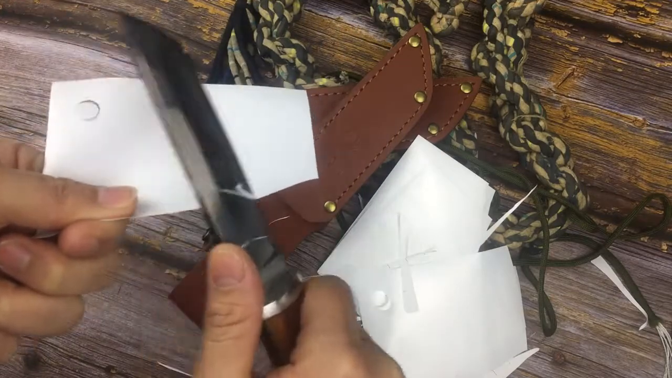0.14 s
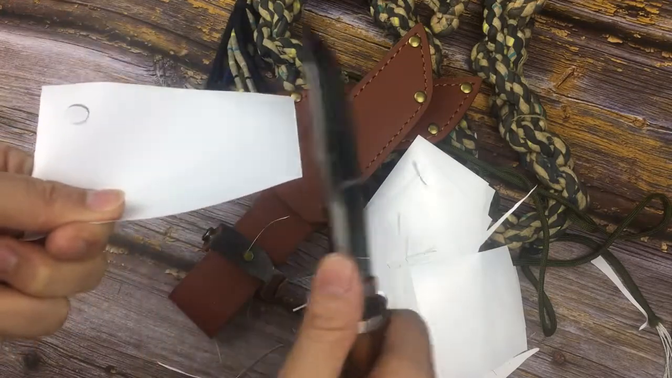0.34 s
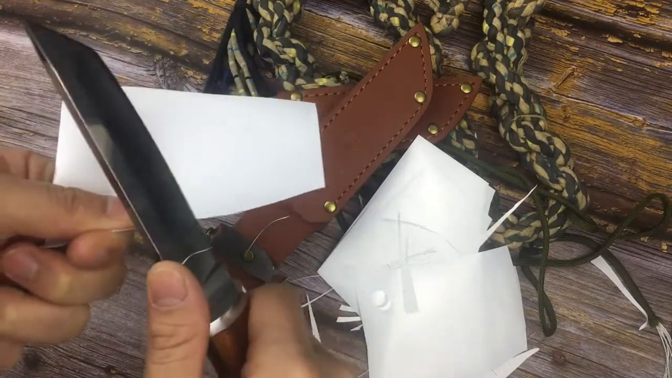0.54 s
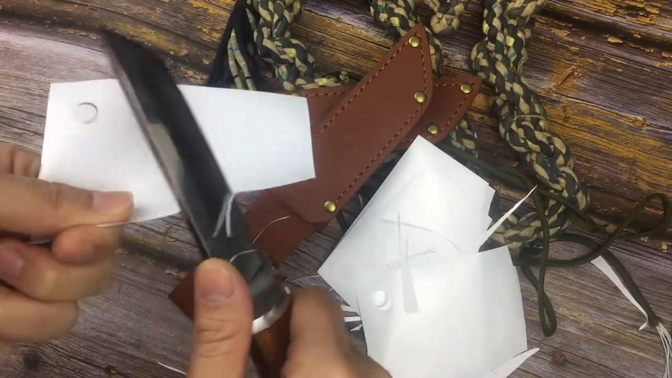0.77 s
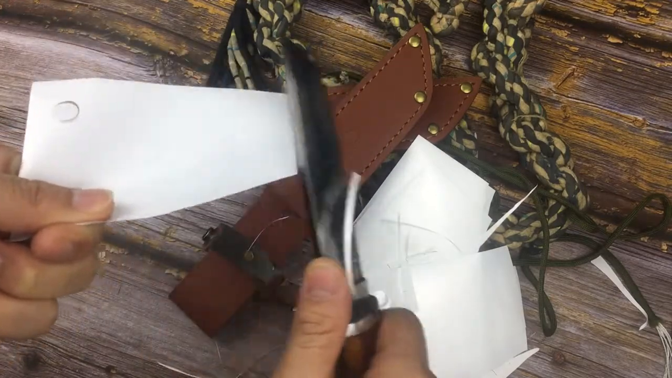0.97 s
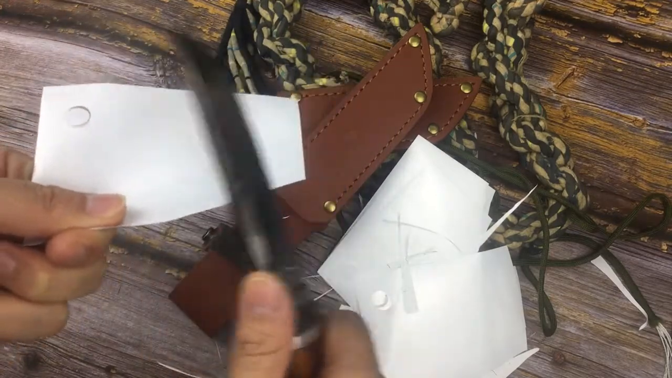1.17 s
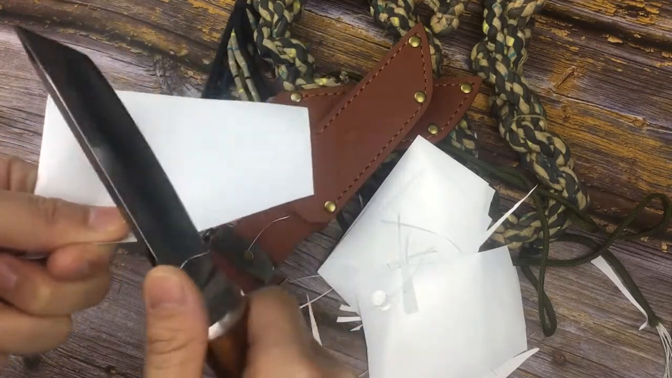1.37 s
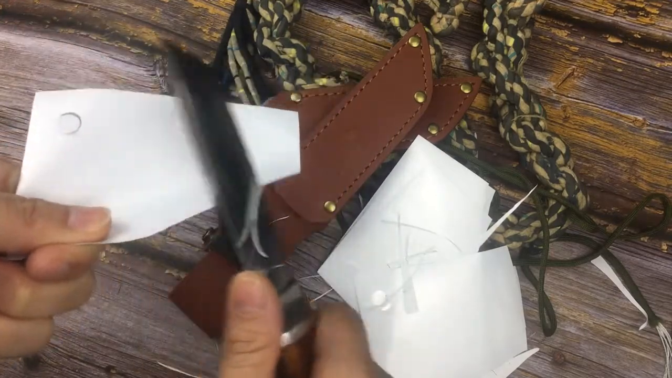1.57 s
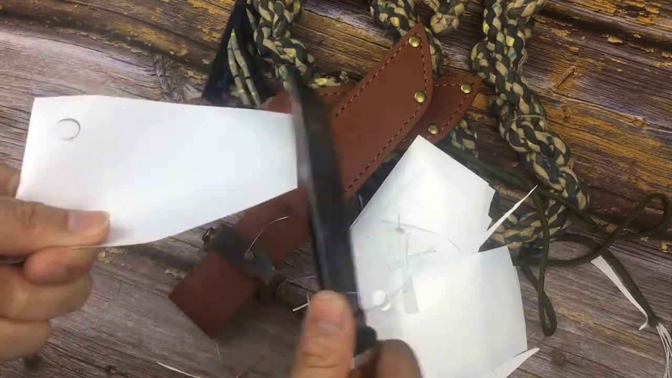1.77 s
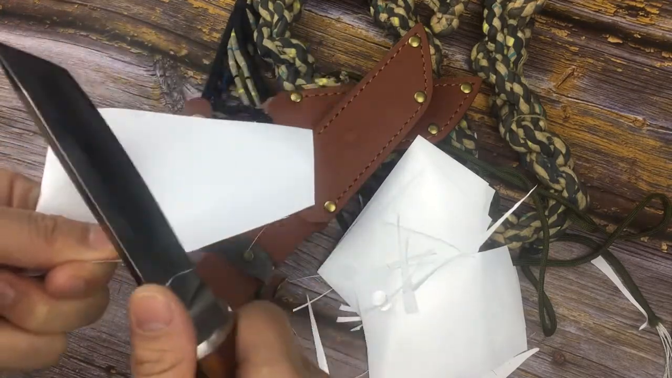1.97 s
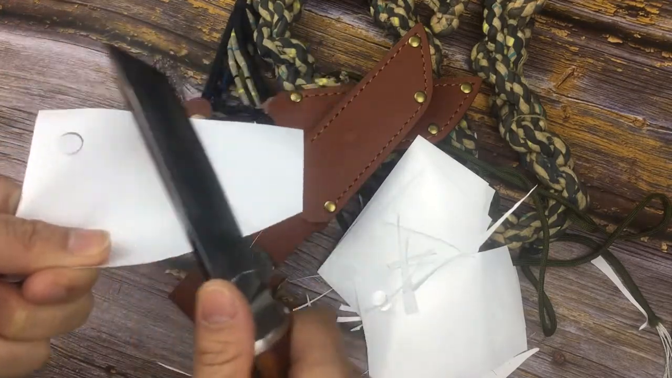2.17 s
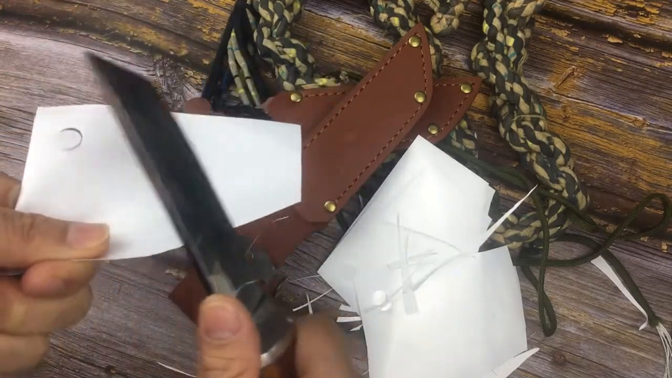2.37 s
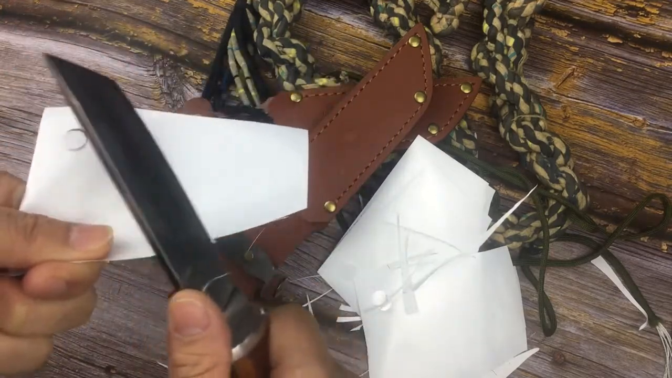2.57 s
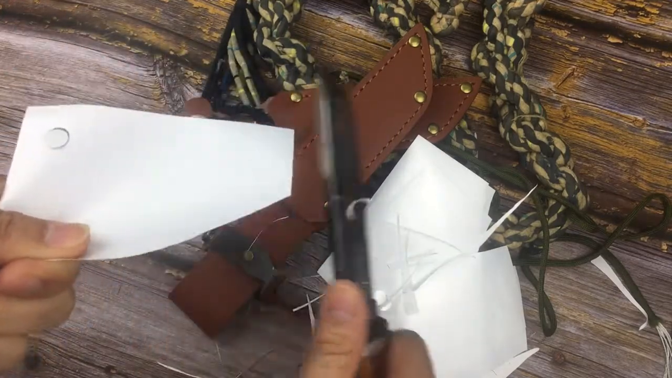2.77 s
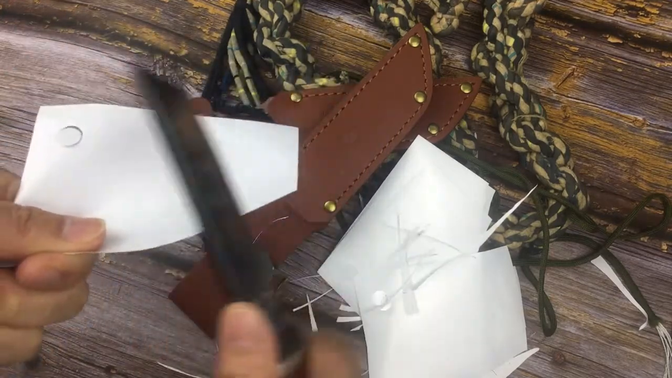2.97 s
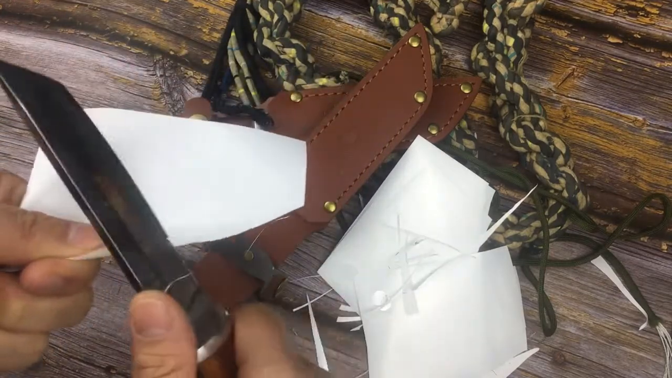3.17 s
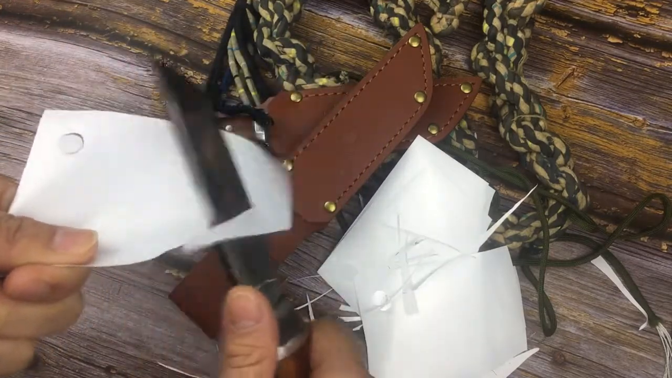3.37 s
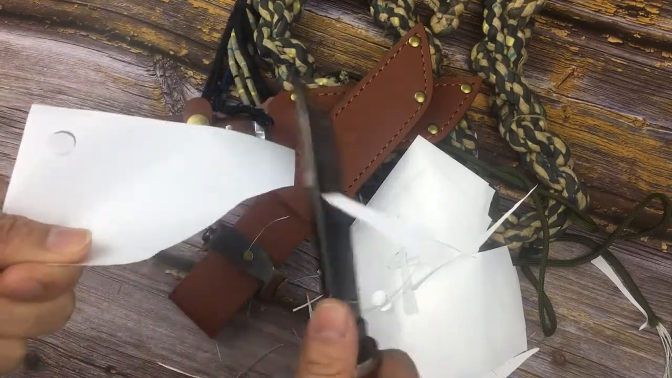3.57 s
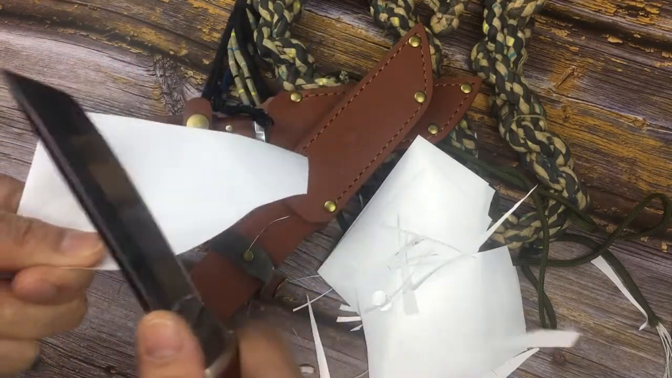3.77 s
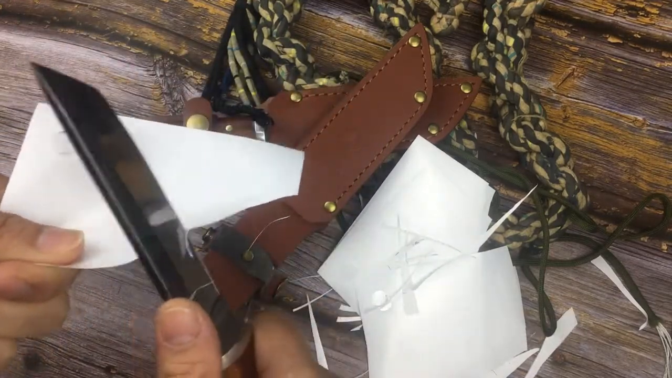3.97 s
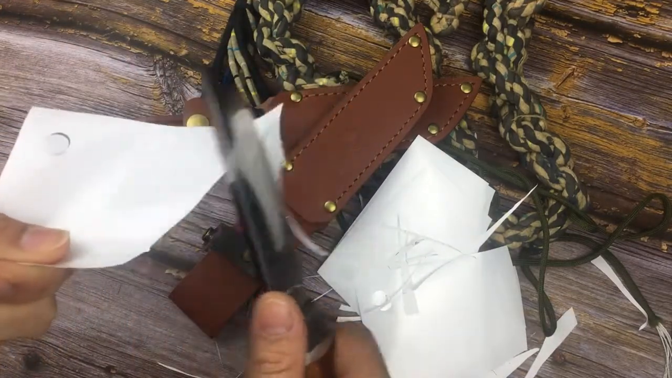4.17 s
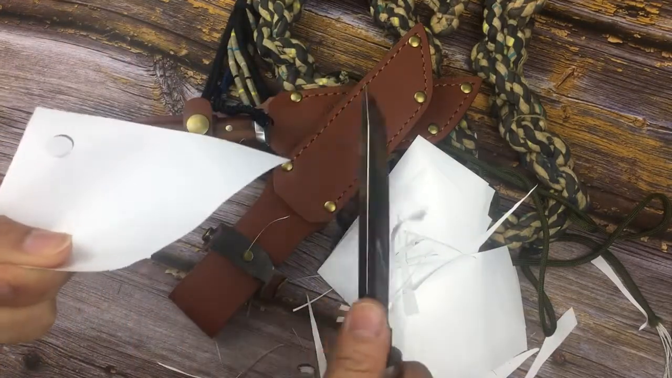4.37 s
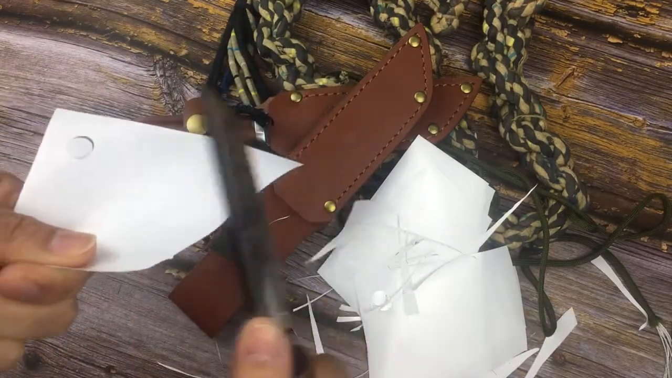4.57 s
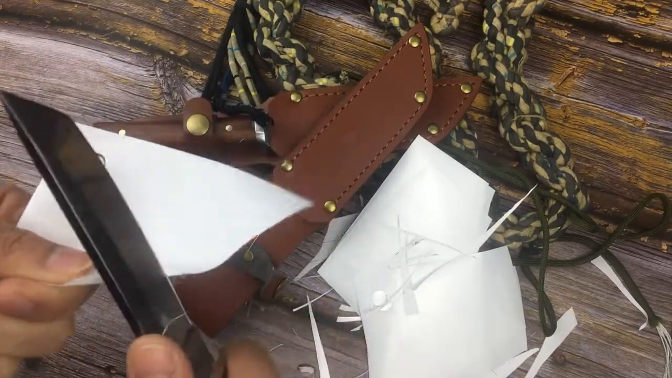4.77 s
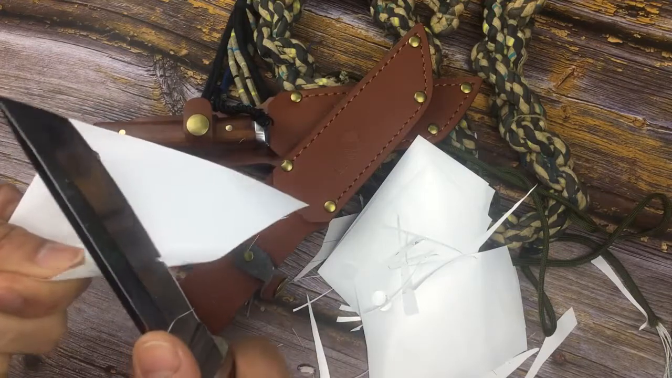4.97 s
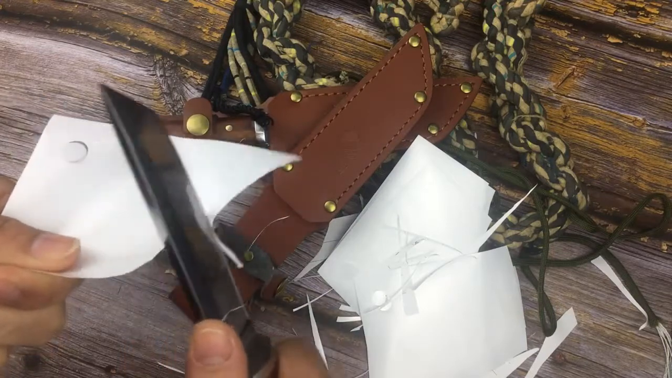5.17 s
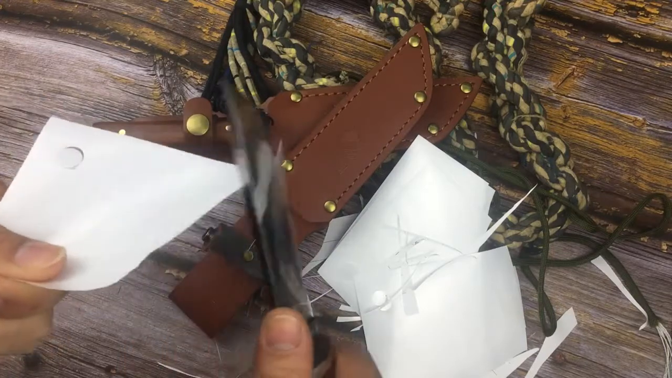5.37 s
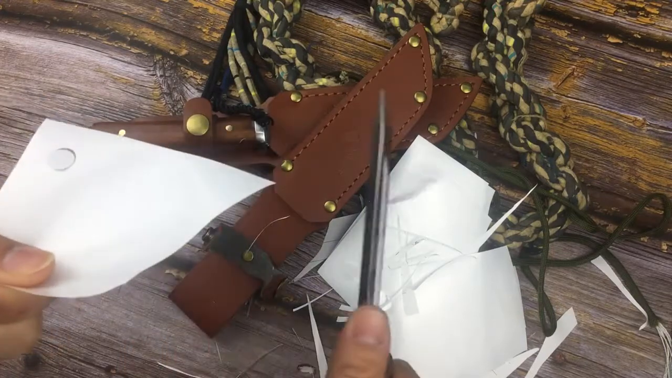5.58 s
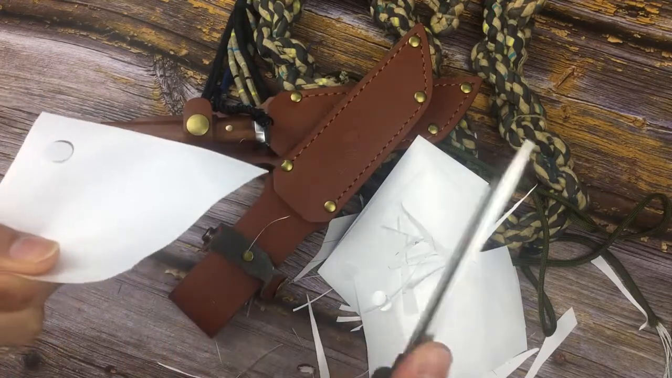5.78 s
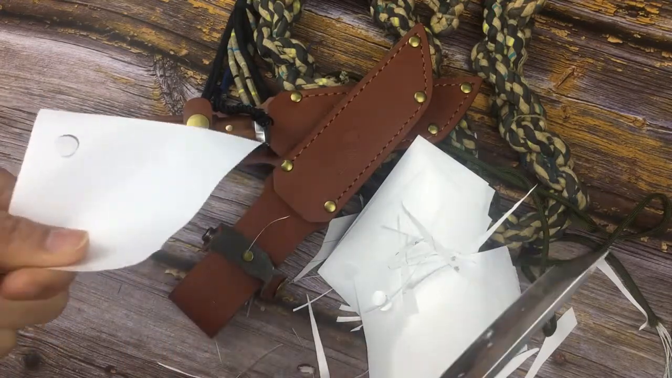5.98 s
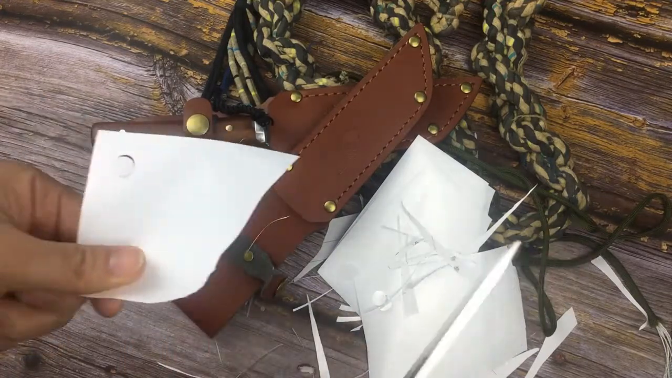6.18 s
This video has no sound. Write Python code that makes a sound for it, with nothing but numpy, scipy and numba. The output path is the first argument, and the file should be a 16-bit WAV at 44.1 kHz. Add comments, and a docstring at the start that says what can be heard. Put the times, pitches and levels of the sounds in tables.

```python
"""A blade is heard first sliding faintly over paper, in a small quiet room with low rumble and mains hum.
A sharp knife then shaves eight strips off the sheet, held above a wooden board and close to the microphone.
Cutting is a dense train of random fibre clicks, part of it passed through the sheet's wandering resonances.
Snaps, flaps, taps and crinkles are short decaying noise bursts; squeaks are sines of unsteady pitch.
A board reflection and a short decaying tail place the paper in the room."""
import sys
import numpy as np
from scipy import signal
from scipy.fft import rfft, irfft
from scipy.io import wavfile
from numba import njit

SR = 44100
rng = np.random.default_rng(int(sys.argv[2]) if len(sys.argv) > 2 else 0)


def dump_mix(stems):
    """Bounce the given channels to the path in sys.argv[1] as a 16-bit WAV at rate SR."""
    frames = np.atleast_2d(stems).T  # one column per channel
    limited = np.clip(frames, -1, 1)  # hard clip at full scale
    pcm = np.round(limited * 32767).astype(np.int16)
    wavfile.write(sys.argv[1], SR, pcm)


N = 274724
T = np.arange(N) / SR


def undb(db):
    """Amplitude ratio: 20 dB is a factor of ten."""
    return 10 ** (np.asarray(db) / 20)


def unit(x):
    """Normalisation of the mean power: scale to an rms of 1."""
    return x / np.sqrt(np.mean(x ** 2))


def walk(rate):
    """Random modulation: straight lines join normal draws, rate a second; the last of 4096 is held."""
    knots = rng.standard_normal(4096)
    return np.interp(T * rate, np.arange(len(knots)), knots)


def colour(x, points, size=4096):
    """Minimum-phase filtering: a causal filter follows (frequency [Hz], gain [dB]) points."""
    hz, db = np.transpose(points)
    bin_hz = np.arange(size // 2 + 1) * SR / size
    gain_db = np.interp(np.log(bin_hz + 1), np.log(hz), db)
    cepstrum = irfft(np.log(undb(gain_db)))
    # folding the cepstrum onto positive times makes the filter causal
    cepstrum[1:size // 2] *= 2
    cepstrum[size // 2 + 1:] = 0
    impulse_response = irfft(np.exp(rfft(cepstrum)))
    return signal.fftconvolve(x, impulse_response)[:len(x)]


@njit
def resonate(x, hz, width):
    """Simple resonance: a band-pass with a moving centre and gain 1 at the peak."""
    y = np.empty(len(x))
    band, low = 0., 0.  # the two stored states
    for i in range(len(x)):
        g = np.tan(np.pi * hz[i] / SR)
        damping = width / hz[i]
        v = (band + g * (x[i] - low)) / (1 + g * (g + damping))
        band = 2 * v - band
        low = low + 2 * g * v
        y[i] = damping * v
    return y


def background(air_db=-58.5, air_waver_db=1.8, hum_waver_db=0.5, hum_width_hz=5.6):
    """Ambient noise: shaped broadband rumble and hiss, plus narrow-band hum of wavering level."""
    # spectral shape of the quiet room's air: (frequency [Hz], relative density [dB per Hz])
    air_shape = [(22, -20), (38, 3), (60, -1), (78, -13), (105, -5.5), (170, -7), (240, -18.5),
                 (330, -13.5), (470, -19), (800, -18), (2000, -27), (3200, -36), (5000, -40), (9600, -42)]
    # mains hum and a faint whirr: (frequency [Hz], mean level [dB])
    hum_lines = [(53, -63.5), (100, -68), (150, -72.5), (320, -74), (351, -72)]
    air = unit(colour(rng.standard_normal(N), air_shape, size=16384))
    air = air * undb(air_db + air_waver_db * walk(5.04))
    hum = 0
    for hz, db in hum_lines:
        level = undb(db + hum_waver_db * walk(3.7))
        hum = hum + level * unit(resonate(rng.standard_normal(N), np.full(N, float(hz)), hum_width_hz))
    return air + hum


def room(x, board_s=0.001403, board_db=-14, wet_db=-17, t60=0.28, size=22050):
    """Reflection and reverberation: one quick echo off the board and a tail falling 60 dB in t60 seconds."""
    t = np.arange(size) / SR
    build_up = 1 - np.exp(-t / 0.011)
    tail = rng.standard_normal(size) * undb(-60 * t / t60) * build_up
    tail = colour(tail, [(100, 12), (1500, 0.5), (4000, 0.5), (10000, -4)])
    # the path via the board changes as the hand moves
    echo = np.interp(T - board_s * (1 + 0.18 * walk(3)), T, x)
    reverberation = signal.fftconvolve(x, tail / np.linalg.norm(tail))[:N]
    return x + undb(board_db) * echo + undb(wet_db) * reverberation


def buckles(table, shape, flutter, tail_db, tail_s, size=4096):
    """Buckling: one sharp push, then bending waves that rattle around the sheet and die exponentially.

    Rows: (time [s], level [dB], bass [dB], treble [dB], ring decay [s]);
    shape: (frequency [Hz], relative gain [dB])."""
    out = np.zeros(N + size)
    t = np.arange(size) / SR
    hz, db = np.transpose(shape)
    bass = np.interp(hz, [600, 1100], [1, 0])
    treble = np.interp(hz, [2200, 6500], [0, 1])
    for s, level_db, bass_db, treble_db, ring_s in table:
        decay = np.exp(-t / ring_s) + undb(tail_db) * np.exp(-t / tail_s)
        push = flutter * rng.standard_normal(size) * decay
        push[0] += 1
        burst = colour(push, np.c_[hz, db + bass_db * bass + treble_db * treble])
        # the level is that of the burst's energy spread over 10 ms
        burst_rms = np.sqrt(np.sum(burst ** 2) / (.01 * SR))
        start = int(s * SR)
        out[start:start + size] += undb(level_db) * burst / burst_rms
    return out[:N]


def crinkles(gap_s=0.036, late_s=0.0082, scatter_db=2, treble_db=-3, ring_s=.003):
    """Irregular buckling: rows of faint snaps at uneven times while the grip shifts."""
    # spells of crinkling: (start [s], end [s], mean level of a tick [dB])
    crinkle_spells = [(1.308, 1.32, -61), (1.973, 2.045, -61.5), (5.705, 5.83, -70)]
    rows = []
    for start, end, db in crinkle_spells:
        gaps, sizes = rng.uniform(-1, 1, (16, 2)).T
        times = start + np.r_[0, np.cumsum(gap_s + late_s * gaps)]
        for s, size in zip(times, sizes):
            if s < end:
                rows.append((s, db + scatter_db * size, 0, treble_db, ring_s))
    return rows


def taps():
    """Impact excitation: steel meets the paper edge-on and rings the sheet's lower bends."""
    # light, hollow taps: (time [s], level [dB], bass [dB], treble [dB], ring decay [s])
    tap_rows = [(1.4339, -36.5, -8, -8.5, 0.0019), (2.5627, -40.5, -7, -17.5, 0.00071),
                (3.1728, -45, 6, -11, 0.0067), (3.9457, -43, -3.5, -17, .003),
                (4.5144, -41.5, -7, -24, 0.0013), (4.7475, -51, 9, -16, 0.0013)]
    shape = [(60, -28), (300, -3.5), (700, -4.5), (1000, 4), (1400, 3.5), (2100, 2.5),
             (3000, -4), (4500, -4.5), (7000, -1), (9500, -13.5), (11000, -31)]
    return buckles(tap_rows, shape, flutter=0.2, tail_db=-13.0, tail_s=0.012)


def flaps(ring_s=0.0042):
    """Elastic release: the sheet springs free at the end of a cut with a duller flap."""
    # flaps of the freed sheet: (time [s], level [dB], bass [dB], treble [dB])
    flap_rows = [(0.2996, -36.5, 0, -19), (1.0059, -36.5, 0, -19), (1.711, -43, -7, -7),
                 (1.7151, -33.5, -2.5, -11), (2.807, -38.5, 1, -34), (2.811, -38, 1, -4),
                 (2.832, -45, 2, -11), (3.5185, -40.5, 6.5, -3), (4.3194, -44.5, -0.5, -26),
                 (5.479, -35, 4, -16)]
    shape = [(60, -26.0), (200, 1.0), (380, 4), (520, -3.5), (750, 2.0), (920, -2.5), (1250, 5.0),
             (2000, 1.5), (3000, -5.5), (6500, -1.5), (9500, -7.0), (11000, -37.5)]
    rows = [(*flap, ring_s) for flap in flap_rows]
    return buckles(rows, shape, flutter=0.39, tail_db=-21.5, tail_s=0.027)


def snaps():
    """Sudden buckling: the taut sheet snaps crisply as it is caught or bent; crinkles are faint snaps."""
    # snaps of the taut sheet: (time [s], level [dB], bass [dB], treble [dB], ring decay [s])
    snap_rows = [(0.601, -49, -6, -13, 0.0028), (.8227, -34, -31, -6, .003), (0.848, -30.5, -27, 2, 0.0038),
                 (1.2827, -55, 9, 6, .002), (1.9287, -62.5, -15, -5, .006), (2.117, -48, -9, -9, .006),
                 (2.2025, -45.5, -12, -14, .008), (2.607, -50, -8, -5, 0.011), (2.7102, -34.5, -4, 3, .003),
                 (2.7765, -32.5, -19, -4, 0.007), (3.216, -48, 1, -18, .0033),
                 (3.54, -37.5, -11.5, -8, .0035), (3.9083, -59, -13, -9, .002),
                 (3.9454, -44, -4, 7, 0.0021), (3.9868, -38.5, -24, -8, 0.0022),
                 (3.9978, -31, -13, -3.5, 0.0033), (4.303, -40.5, 4, 4, 0.0013),
                 (4.561, -60.5, 8, 6, 0.011), (4.7175, -58, 3, 19, 0.0022), (4.8029, -45, 2, -10, 0.003),
                 (5.1268, -36, -44, -2.5, 0.0013), (5.4768, -40.5, -15, 8, 0.0035),
                 (5.5132, -51, -2, -8, .005)]
    shape = [(60, -39.5), (250, -10.5), (600, 3.0), (1100, -4.5), (2000, 5.5), (2800, 0.5),
             (3800, 2.0), (6500, 0.5), (9500, -0.5), (11000, -28.0)]
    return buckles(snap_rows + crinkles(), shape, flutter=0.16, tail_db=-13.5, tail_s=0.01)


def squeaks(rough_db=0.5):
    """Stick-slip oscillation: friction on the blade's flank locks for a moment onto one bend of the sheet."""
    # squeaks: (time of peak [s], half length to 1/e [s], frequency [Hz], width [Hz], peak level [dB])
    squeak_rows = [(0.813, 0.02, 2120, 330.6, -43.5), (0.913, 0.013, 3450, 402, -37.5),
                   (2.663, 0.014, 730, 79.6, -47), (2.779, 0.0043, 5230, 181.6, -32),
                   (2.794, 0.014, 1950, 250.4, -40.5), (5.108, 0.085, 3610, 801, -54),
                   (5.154, 0.011, 2900, 599, -43.5)]
    out = np.zeros(N)
    for s, half_s, hz, width, db in squeak_rows:
        wobble_hz = width / 2 * walk(width)
        tone = np.sqrt(2) * np.sin(2 * np.pi * np.cumsum(hz + wobble_hz) / SR)
        swell = np.exp(-((T - s) / half_s) ** 2)
        out += tone * undb(db + rough_db * walk(width)) * swell
    return out


def stroke(start, end, first_db, last_db, swell_db, first_treble_db, last_treble_db,
           bite_db_per_s=647, release_db_per_s=750.5, dull_db=-5, dull_s=0.0084):
    """Exponential onset and decay: a stroke sets in, slides between two states, dies away and darkens."""
    along = np.clip((T - start) / (end - start), 0, 1)
    fade_db = bite_db_per_s * np.maximum(start - T, 0) + release_db_per_s * np.maximum(T - end, 0)
    level_db = first_db + (last_db - first_db) * along + swell_db * np.sin(np.pi * along) - fade_db
    treble_db = first_treble_db + (last_treble_db - first_treble_db) * along
    return level_db, treble_db + dull_db * np.clip((T - end) / dull_s, 0, 1)


def travel():
    """Incoherent addition: overlapping strokes add their power, giving relative level and treble lift [dB]."""
    # passes of the blade through the sheet: (bites [s], leaves [s], relative level at bite [dB],
    # at exit [dB], mid-cut swell [dB], relative treble at bite [dB], at exit [dB])
    cut_rows = [(0.215, 0.295, -41, -41, -0.5, -0.5, -0.5), (0.802, 1.004, -50, -43.5, 3.5, 3.5, 2),
                (1.464, 1.707, -47.5, -40.5, 2.5, -6, 1.5), (2.224, 2.33, -41.5, -44.5, 4.5, 1.5, -9.5),
                (2.637, 2.797, -43.5, -39, 3.5, -6.5, 4), (3.225, 3.508, -55, -47, 0.5, -0.5, 2),
                (4.005, 4.298, -46, -46.5, -2.5, -4, -1.5), (5.146, 5.477, -44, -47, -7, -9, 2.5)]
    # light slides of blade or fingers over the paper: (start [s], end [s], first relative level [dB],
    # last relative level [dB], relative treble [dB])
    graze_rows = [(.01, 0.206, -58.5, -52, -1.5), (0.688, 0.804, -63.5, -47, -2),
                  (2.13, 2.172, -46, -55, -5.5), (3.558, 3.64, -67.5, -76, 1),
                  (3.895, 3.922, -57.5, -67, -4), (3.967, 3.983, -43, -57, -11),
                  (4.336, 4.41, -74, -70, 2.5), (4.811, 4.873, -59.5, -56, -6.5),
                  (4.943, 4.959, -52, -54.5, -2), (5.016, 5.134, -56, -50.5, -4),
                  (5.55, 5.872, -68, -69.5, -2.5), (5.952, 6.134, -79.5, -64.5, 3.5),
                  (6.146, 6.226, -64.5, -70, 3)]
    # surges as the edge drags through a stiffer patch: (time of peak [s], half length to 1/e [s],
    # relative level [dB], relative treble [dB])
    surge_rows = [(0.945, 0.029, -35.5, 0), (1.498, 0.024, -41.5, -20), (1.599, 0.015, -41.5, 6),
                  (1.646, .012, -41, 3), (2.268, .012, -35.5, -12), (2.629, .006, -41, -4),
                  (2.672, .01, -35.5, -27), (3.343, 0.021, -58, 13.5), (3.455, .011, -34, -7.5),
                  (4.072, 0.03, -53, 7.5), (4.207, 0.034, -53, 7), (5.154, 0.022, -48.5, 5.5),
                  (5.415, 0.04, -55.5, 5.5)]
    parts = [stroke(*cut) for cut in cut_rows]
    for start, end, first_db, last_db, treble_db in graze_rows:
        parts.append(stroke(start, end, first_db, last_db, 0, treble_db, treble_db))
    for s, half_s, db, treble_db in surge_rows:
        # a bell-shaped swell, written in decibels
        parts.append((db - 20 / np.log(10) * ((T - s) / half_s) ** 2, treble_db))
    body = sum(undb(np.maximum(db, -120)) ** 2 for db, _ in parts)
    treble = sum(undb(np.maximum(db + lift_db, -120)) ** 2 for db, lift_db in parts)
    return 10 * np.log10(body), 10 * np.log10(treble / body)


def ruptures(rate, spread_db):
    """Shot noise: random tiny clicks of uneven size, rate a second, at a steady mean power."""
    hit = rng.random(N) < rate / SR
    sign = rng.choice([-1, 1], N)
    size = undb(spread_db * rng.standard_normal(N))
    return unit(hit * sign * size / np.sqrt(rate))


def slicing(ring_db=-1, graze_db=-9, drift=0.031, patchy_db=4, grain_db=1.24, snag_db=1.42,
            split_hz=3800, slow_rate=1200, fast_rate=12000, level_lift_db=2.5, treble_lift_db=2.5):
    """Modal excitation: parting fibres ring the sheet, whose resonances wander as it bends."""
    # broad colour of the parting fibres: (frequency [Hz], relative density [dB per Hz])
    fibre_colour = [(80, -30), (200, -10), (450, -6), (720, -4), (920, -10), (1220, -2), (2000, -1),
                    (2900, -2.5), (3800, -1), (5000, -2.5), (7500, -5), (9600, -4)]
    # bending resonances of the held sheet: (mean frequency [Hz], nominal width [Hz], relative level [dB])
    sheet_modes = [(715, 150, -11.5), (1233, 300, -2.5), (1910, 336, -1), (2107, 104, 2.5), (2545, 210, -6),
                   (3130, 220, -2.5), (3680, 215, 2), (4410, 95, -1.5), (5400, 81, -1), (5770, 200, -1.5),
                   (6350, 320, -4), (7024, 91, -4), (8670, 270, -8)]
    level_db, treble_db = travel()
    # a light touch frees single fibres, a fast cut a dense stream of them
    rate = np.interp(level_db, [-70, -42], [slow_rate, fast_rate])
    crackle = unit(colour(ruptures(rate, spread_db=1.0), fibre_colour))
    ring = 0
    for hz, width, db in sheet_modes:
        centre = hz * (1 + drift * walk(9))
        # two wider filters in a row make one mode
        mode = resonate(ruptures(rate, spread_db=2.0), centre, width * 1.17)
        mode = resonate(mode, centre, width * 1.17)
        # each resonance swells and fades as the cut crosses its nodes
        ring = ring + undb(db + patchy_db * np.tanh(walk(28))) * mode
    # only a firm cut sets the sheet ringing; a light graze is plainer rustle
    ringing = undb(ring_db + np.interp(level_db, [-66, -42], [graze_db, 0]))
    cut = (crackle + ringing * unit(ring)) / np.sqrt(1 + ringing ** 2)
    # a fast, clean cut is brighter than a dragging one
    body = signal.sosfiltfilt(signal.butter(2, split_hz, fs=SR, output="sos"), cut)
    cut = body + undb(treble_db + treble_lift_db) * (cut - body)
    # the edge sticks and slips on clumps of fibre
    roughness_db = grain_db * walk(420) + snag_db * walk(70)
    return cut * undb(level_db + level_lift_db + roughness_db)


def scene():
    """Superposition: the paper sounds in the room add to its background."""
    paper = slicing() + squeaks() + snaps() + taps() + flaps()
    return (room(paper) + background())[None]


def record(dry, bass_hz=30, top_hz=9600):
    """Band limiting: the microphone loses the deepest bass and the recorder cuts the top steeply."""
    dry = signal.sosfilt(signal.butter(4, bass_hz, "high", fs=SR, output="sos"), dry)
    return signal.sosfilt(signal.ellip(12, .2, 70, top_hz, fs=SR, output="sos"), dry)


dry = scene()
out = record(dry)
dump_mix(out)
```